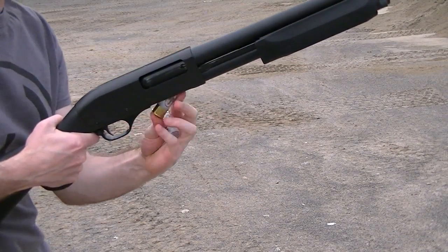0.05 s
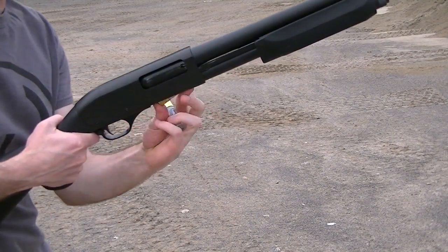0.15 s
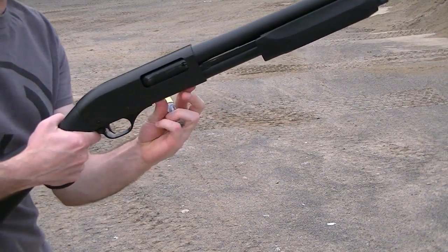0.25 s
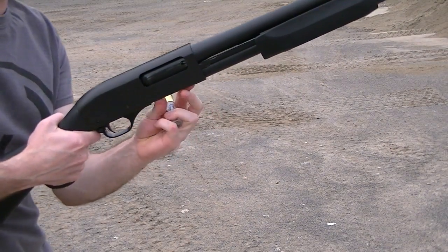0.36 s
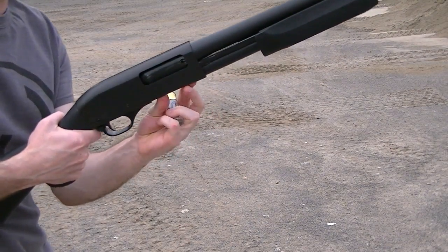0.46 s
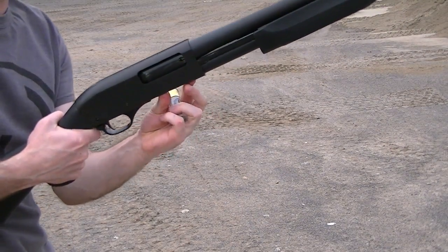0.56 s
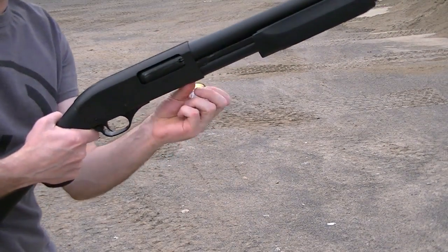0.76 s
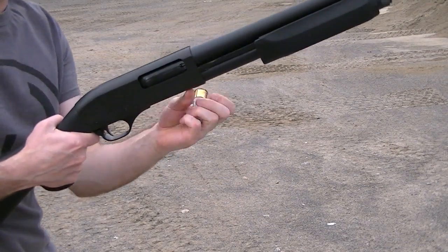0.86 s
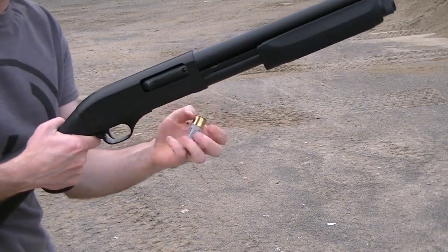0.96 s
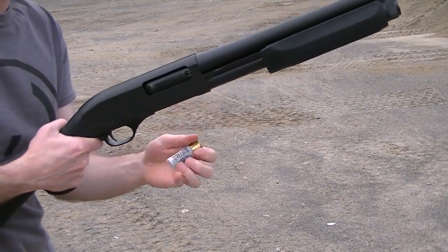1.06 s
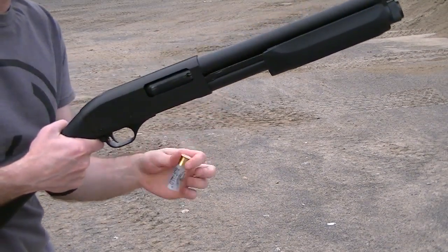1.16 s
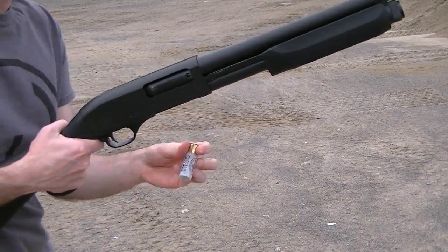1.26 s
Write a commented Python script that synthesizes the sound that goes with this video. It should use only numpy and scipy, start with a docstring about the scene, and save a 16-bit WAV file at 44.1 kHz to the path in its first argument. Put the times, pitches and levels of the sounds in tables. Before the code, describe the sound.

A shell is loaded into a pump-action shotgun, close by, outdoors. Light metallic clicks come at about 0.15, 0.2, 0.3 and 0.5 seconds. From 0.6 seconds the shell scrapes into the tube with a slight squeak, ending in a loud, briefly ringing snap at 0.75. A clack follows near 0.9 seconds, then a smaller click. Only faint air and a faint distant drone remain until about 1.3 seconds.

```python
"""Outdoors on bare ground, a shell is thumbed into the magazine of a pump-action shotgun.
Its brass head clicks against the loading port, the hull scrapes and squeaks up the tube, the sprung shell
stop snaps over the rim, and the lifter clacks back as the thumb leaves. Each click rings the receiver.
Faint air and a far drone lie behind; gain control ducks the level after the snap."""
import sys
import numpy as np
from scipy import signal
from scipy.fft import rfft, irfft, next_fast_len
from scipy.io import wavfile
from scipy.ndimage import uniform_filter1d, map_coordinates

SR = 44100
rng = np.random.default_rng(int(sys.argv[2]) if len(sys.argv) > 2 else 0)


def wav_out(sig):
    """Save sig, one row per channel (or a flat mono array), as 16-bit PCM at SR to the path in sys.argv[1]."""
    wavfile.write(sys.argv[1], SR, np.round(np.clip(np.atleast_2d(sig).T, -1, 1) * 32767).astype(np.int16))


N = 57330
STEEL_RISE_S = .00038  # attack of a metal contact


def amp(db):
    return 10 ** (np.asarray(db) / 20)


def unit(x):
    return x / np.sqrt(np.mean(x ** 2) + 1e-20)


def clock():
    return np.arange(N) / SR


def fade(t, t60):
    return 1000.0 ** (-t / t60)


def curves(rows):
    """Breakpoint envelopes: one for each column after the time."""
    times, *columns = np.transpose(rows)
    return [np.interp(clock(), times, column) for column in columns]


def wobble(rate):
    """A smooth random curve, rate knots a second."""
    return map_coordinates(rng.standard_normal(N), [clock() * rate], mode="wrap")


def high_pass(x, hz):
    return signal.sosfilt(signal.butter(2, hz, "high", fs=SR, output="sos"), x)


def coloured(x, points):
    """Minimum-phase EQ through points of (frequency [Hz], gain [dB])."""
    size = 2 * next_fast_len(len(x))
    hz, db = np.transpose(points)
    gain_db = np.interp(np.log(np.fft.rfftfreq(size, 1 / SR) + 1), np.log(hz + 1), db)
    cepstrum = irfft(np.log(amp(gain_db)), size)
    cepstrum[1:size // 2] *= 2
    cepstrum[size // 2 + 1:] = 0
    return irfft(rfft(x, size) * np.exp(rfft(cepstrum)), size)[:len(x)]


def add(track, start_s, sound):
    """Mix a sound into the track."""
    i = max(round(start_s * SR), 0)
    track[i:i + len(sound)] += sound[:N - i]


def air():
    """A steady bed of faint outdoor air."""
    # colour of the air (frequency [Hz], gain [dB])
    air_eq = [(15, -60), (25, -19), (79, -8.5), (331, -10), (582, -12.5), (684, -7), (762, -9.5),
              (1140, -14.5), (1240, -16), (1410, -16.5), (2060, -20), (3170, -21.5), (4380, -23.5),
              (8810, -27.5), (15500, -34.5)]
    return amp(-53) * unit(coloured(rng.standard_normal(N), air_eq))


def far_drone():
    """Two distant tones, wavering in pitch and level."""
    # swell of the drone (time [s], lower tone [dB], upper tone [dB])
    swell = [(0, -63, -65), (.2, -59.5, -59), (.42, -61, -67), (.6, -62, -73), (.95, -59, -72),
             (1.121, -63, -58), (1.3, -53, -52.5)]
    tones_hz, waver_hz, waver_db = (651, 703), 6, 3
    out = np.zeros(N)
    for hz, db in zip(tones_hz, curves(swell)):
        phase = 2 * np.pi * np.cumsum(hz + waver_hz * wobble(25)) / SR
        out += np.sqrt(2) * amp(db + waver_db * wobble(14.17)) * np.sin(phase)
    return out


def outdoors(x):
    """The direct sound, one bounce off the ground and a thin, short scatter from the surroundings."""
    # colour of bounce and scatter (frequency [Hz], gain [dB])
    echo_eq = [(100, 7.5), (2000, -1.5), (7000, -4), (11000, 4.5), (16000, -18)]
    ground_delay_s = .0055
    t = np.arange(SR // 4) / SR
    scatter = rng.standard_normal(len(t)) * fade(t, t60=.062)
    response = amp(-18) * scatter / np.linalg.norm(scatter)
    response[0] += amp(-15)  # the ground bounce
    out = x.copy()
    add(out, ground_delay_s, coloured(signal.fftconvolve(x, response)[:N], echo_eq))
    return out


def friction(eq):
    """Tiny random slips over a fine hiss, rms 1."""
    slips_per_s = 1900
    slips = (rng.random(N) < slips_per_s / SR) * rng.standard_normal(N)
    return unit(coloured(amp(-1.5) * unit(slips) + rng.standard_normal(N), eq))


def rubs():
    """Shell and fingers brush lightly around the port."""
    # brief strokes (start [s], length [s], level [dB])
    strokes = [(.234, 0.03, -44), (0.303, 0.044, -52), (0.477, 0.011, -47), (0.862, 0.015, -43)]
    # colour of a stroke (frequency [Hz], gain [dB])
    rub_eq = [(200, -23), (900, 7), (1300, 11.5), (3000, 11), (5500, 1.5), (8000, 1), (15000, -42)]
    t, edge_s = clock(), .0016
    envelope = sum(amp(db) * np.clip(np.minimum(t - start, start + length - t) / edge_s, 0, 1)
                   for start, length, db in strokes)
    return friction(rub_eq) * envelope


def bumps():
    """Hand and hull bump dully on the gun: one low mode and a puff of noise each."""
    # soft contacts (time [s], pitch [Hz], level [dB], t60 [s])
    contacts = [(.196, 308, -41.5, 0.033), (.2775, 343, -36, 0.045), (0.2773, 776, -22.5, .016),
                (0.338, 273, -42.5, 0.088), (0.5646, 125, -36, 0.045), (0.5647, 237, -37.5, 0.039),
                (0.741, 430, -39.5, 0.09), (0.8759, 337, -30.5, 0.083)]
    # colour of the puff (frequency [Hz], gain [dB])
    puff_eq = [(40, -29), (150, 4), (500, 7), (1200, -11.5), (3000, -9), (9000, -51)]
    out, t = np.zeros(N), np.arange(SR // 6) / SR
    attack = 1 - np.exp(-t / .00062)
    for start, hz, db, t60 in contacts:
        puff = amp(-5) * unit(coloured(rng.standard_normal(len(t)), puff_eq)) * fade(t, t60=.04)
        puff = high_pass(puff, .71 * hz)
        thud = np.sin(2 * np.pi * hz * t) * fade(t, t60)
        add(out, start, amp(db) * (thud + puff) * attack)
    return out


def hull_slide():
    """The hull scrapes up the tube, squeaks where it binds and fizzes as the spring tightens."""
    # envelope of the scrape (time [s], level [dB])
    push = [(.59, -68), (.632, -41.5), (.6405, -32), (.654, -28), (.665, -37), (.679, -36.5), (.696, -28),
            (.702, -40.5), (.709, -32), (.72, -33.5), (.737, -37), (.755, -62)]
    # colour of the scrape (frequency [Hz], gain [dB])
    scrape_eq = [(120, -49), (200, -16.5), (575, -17.5), (665, -5), (798, -20), (890, -10), (1710, -9),
                 (2060, -6.5), (2330, -9), (3240, -8), (6350, 0), (10800, -27), (15500, -25)]
    # moments when the hull binds (time [s], half length [s], level [dB])
    binds = [(.6398, .002, -30), (.651, .008, -34), (.694, .007, -34), (.708, .003, -36)]
    # colour of the bright fizz (frequency [Hz], gain [dB])
    fizz_eq = [(3000, -37.5), (7000, -6), (9000, 7), (10500, -10), (15000, -20)]
    squeak_hz, climb_hz_per_s, width_hz = 5980, 14000, 340
    t = clock()
    phase = 2 * np.pi * np.cumsum(squeak_hz + climb_hz_per_s * (t - .639)) / SR
    squeak = unit(wobble(width_hz) * np.sin(phase) + wobble(width_hz) * np.cos(phase))
    binding = sum(amp(db) * np.exp(-((t - peak) / half) ** 2) for peak, half, db in binds)
    fizz = amp(-37.5) * np.exp(-((t - .712) / .0067) ** 2) * friction(fizz_eq)
    scrape_db, = curves(push)
    sliding = (t > push[0][0]) & (t < push[-1][0])
    scrape = amp(scrape_db) * sliding * friction(scrape_eq)
    return scrape + binding * squeak + fizz


def ring(t, modes):
    """Damped sines at random phases, from (frequency [Hz], level [dB], t60 [s])."""
    return sum(amp(db) * fade(t, t60) * np.sin(2 * np.pi * (hz * t + rng.random()))
               for hz, db, t60 in modes)


def rattle(t, t60):
    """Metal faces chatter: a brief crack and dying noise, evened out across the spectrum."""
    crack_s, band_hz = .00083, 600
    crack = 1 + amp(2) * np.exp(-(t / crack_s) ** 2)
    spectrum = rfft(rng.standard_normal(len(t)) * fade(t, t60) * crack)
    power = np.abs(spectrum) ** 2
    band_power = np.abs(uniform_filter1d(power, size=max(3, int(band_hz * len(t) / SR))))
    return irfft(spectrum * np.sqrt(power.mean() / band_power), len(t))


def receiver_knock(t):
    """The receiver's modes, all struck from rest."""
    # body of the receiver (frequency [Hz], level [dB], t60 [s])
    modes = [(794, -10.5, 0.014), (916.7, -2, 0.021), (1048, -10, 0.011), (1332, -7, 0.028),
             (1810, -10.5, 0.026), (2108, -5.5, .035)]
    return sum(amp(db) * fade(t, t60) * np.sin(2 * np.pi * hz * t) for hz, db, t60 in modes)


def clicks():
    """Each contact is a short, dense steel rattle with two brief rings and the receiver's knock."""
    # contacts of shell, port and lifter (time [s], knock [dB], mid [dB], bright [dB], top [dB],
    # rattle t60 [s], lower ring [Hz], its level [dB], upper ring [Hz], its level [dB])
    contacts = [(.0055, -42.5, -50, -41, -54, 0.032, 4770, -24.5, 5710, -35),
                (.1482, -31, -24, -16, -27.5, .015, 5520, -16, 7700, -23),
                (0.1538, -61, -47, -42, -46, .013, 4400, -39, 6670, -31),
                (0.1926, -43, -32.5, -43, -53, 0.039, 1920, -25, 3370, -35),
                (0.1956, -26, -20, -21, -38.5, 0.016, 3270, -18, 5660, -11.5),
                (.2661, -32.5, -22.5, -14.5, -27, 0.011, 4130, -13.5, 5070, -18),
                (.2718, -32, -45, -36, -62, 0.024, 4020, -26, 6370, -20),
                (0.2762, -30, -31, -32, -53, 0.031, 1960, -41, 5010, -16),
                (0.3158, -39.5, -53, -35, -49, 0.019, 2200, -45, 7040, -32),
                (.3410, -40, -55, -43, -63, .016, 2010, -44, 5570, -35),
                (0.487, -35.5, -36, -47, -46, .018, 4400, -38, 5250, -28),
                (0.4908, -28.5, -27, -18, -49, 0.017, 4330, -19, 5430, -16),
                (0.5024, -68, -41.5, -38, -43, 0.011, 5540, -45, 7600, -31),
                (0.7224, -39.5, -29.5, -16.5, -39, 0.014, 2200, -18, 6850, -28),
                (.7272, -30, -22, -27, -36, 0.012, 2300, -50, 6600, -32),
                (0.7387, -30, -22, -10.5, -26, 0.01, 6400, -23, 7910, -6.5),
                (0.7422, -29, -16, -8, -16, 0.033, 2360, -6.5, 5240, -7.5),
                (0.85, -36, -38, -43, -62, 0.014, 3000, -33, 4930, -25),
                (.8715, -30, -24.5, -34, -32, 0.053, 5130, -20, 13000, -27),
                (0.8748, -17.5, -26, -12, -23, 0.024, 1290, -18, 6850, -9.5),
                (0.8825, -51, -29.5, -20, -39, 0.018, 5500, -15, 6640, -15),
                (0.8891, -34, -36, -31, -41, 0.019, 6000, -30, 7400, -22),
                (0.9167, -43, -45, -29.5, -45, .04, 4600, -42, 6300, -29),
                (0.9216, -38, -38.5, -34, -51, 0.033, 5120, -21, 6400, -35),
                (0.926, -22, -21, -19, -33.5, 0.02, 2350, -18, 6200, -16)]
    ring_t60_s = .009
    out, t = np.zeros(N), np.arange(SR // 10) / SR
    attack = 1 - np.exp(-t / STEEL_RISE_S)
    gate = attack * np.clip(2 - 2 * (t / t[-1]), 0, 1) ** 2
    for start, knock, mid, bright, top, t60, lower_hz, lower_db, upper_hz, upper_db in contacts:
        # a bass slope, then four plateaus (frequency [Hz], gain [dB])
        click_eq = [(80, knock - 37), (280, knock - 14.5),
                    (700, knock - 2), (1510, knock - 2),
                    (1940, mid + 7), (3780, mid + 6),
                    (4460, bright + 4), (7790, bright + 3),
                    (10260, top + 2), (15400, top)]
        rings = ring(t, [(lower_hz, lower_db, ring_t60_s), (upper_hz, upper_db, ring_t60_s)])
        body = amp(knock) * receiver_knock(t)
        chatter = coloured(rattle(t, t60) * gate, click_eq)
        add(out, start, chatter + (rings + body) * gate)
    return high_pass(out, hz=300)  # the clicks carry little below 300 Hz


def shell_stop():
    """The sprung catch snaps over the rim, rings and bounces."""
    # ring of the steel catch (frequency [Hz], level [dB], t60 [s])
    modes = [(1450, -11, .03), (1850, -4, .028), (2300, -4, .03), (2700, -6, .032), (3150, -6, .03),
             (3540, -6, .025), (5660, -1, .03), (6130, -1, .03), (6520, 0, .03), (7150, -2, .028),
             (8080, -2, .028), (11350, -1, .018), (13020, -10, .015), (14750, -12, .015)]
    # bounces on the rim (time [s], level [dB])
    bounces = [(0.7458, -31.5), (.7516, -30.5)]
    # colour of a bounce (frequency [Hz], gain [dB])
    bounce_eq = [(200, -35.5), (1200, 2), (2000, -2), (8000, 3), (11000, -8.5), (15000, -17)]
    snap_s, snap_db = .7424, -13
    out, t = np.zeros(N), np.arange(SR // 10) / SR
    attack = 1 - np.exp(-t / STEEL_RISE_S)
    add(out, snap_s, amp(snap_db) * ring(t, modes) * attack)
    for start, db in bounces:
        add(out, start, amp(db) * coloured(rattle(t, t60=.034) * attack, bounce_eq))
    return out


def scene():
    """The gun and its reflections over the outdoor bed, in mono."""
    gun = clicks() + shell_stop() + bumps() + hull_slide() + rubs()
    return high_pass(outdoors(gun) + air() + far_drone(), hz=45)[None]


def smooth(x, time_s):
    """A one-pole lag."""
    pole = np.exp(-1 / (time_s * SR))
    return signal.lfilter([1 - pole], [1, -pole], x)


def record(dry):
    """Gain control ducks after loud hits and recovers; peaks are rounded and the very top is cut."""
    threshold_db, duck_share, recover_s = -21.5, .9, .11
    ceiling, cut_hz, cut_width_hz = .72, 16300, 500
    level_db = 10 * np.log10(np.abs(smooth(dry[0] ** 2, time_s=.0033)) + 1e-12)
    excess_db = np.maximum(level_db - threshold_db, 0)
    release = np.exp(-clock() / recover_s)
    duck_db = np.maximum.accumulate(duck_share * excess_db / release) * release
    ducked = dry * amp(-smooth(duck_db, time_s=.013))
    rounded = ducked / (1 + (ducked / ceiling) ** 6) ** (1 / 6)
    high_cut = np.clip((cut_hz - np.fft.rfftfreq(2 * N, 1 / SR)) / cut_width_hz, 0, 1) ** 2
    return irfft(rfft(rounded, 2 * N) * high_cut)[:, :N]


dry = scene()
out = record(dry)
wav_out(out)
```